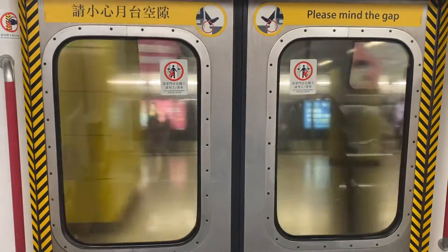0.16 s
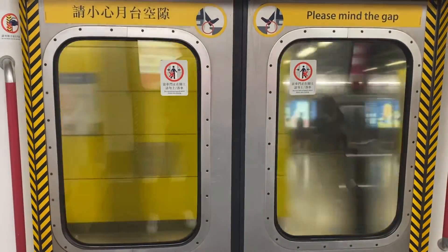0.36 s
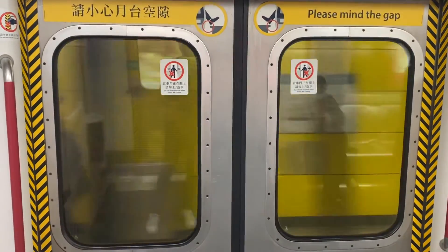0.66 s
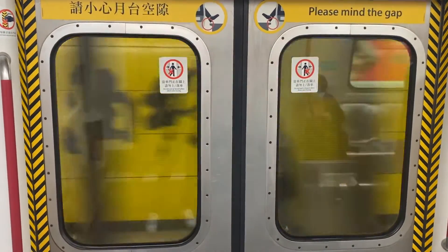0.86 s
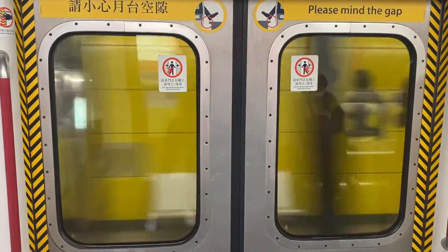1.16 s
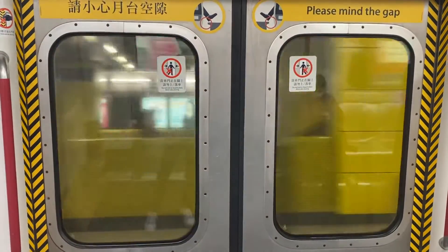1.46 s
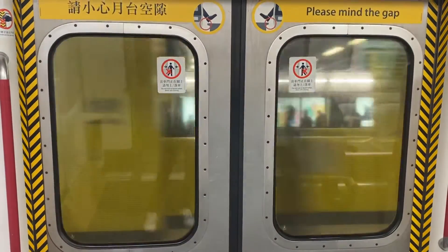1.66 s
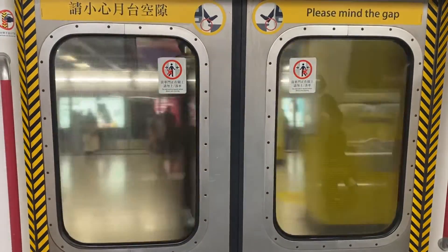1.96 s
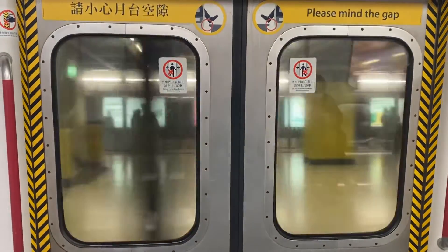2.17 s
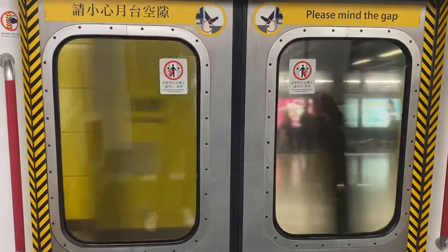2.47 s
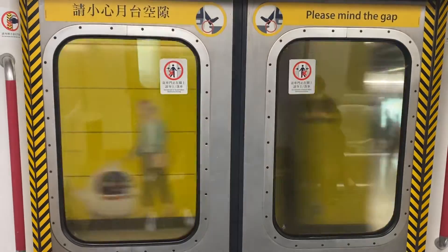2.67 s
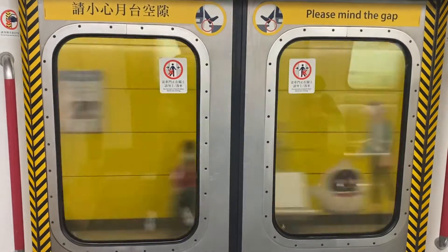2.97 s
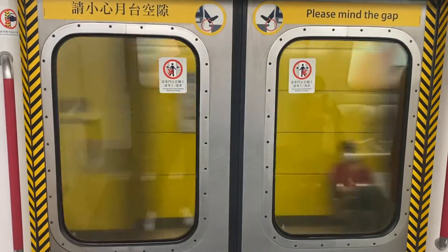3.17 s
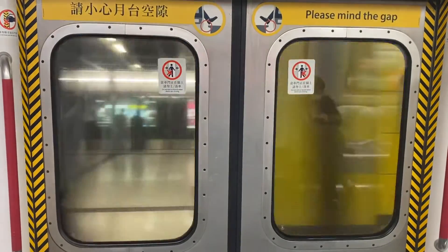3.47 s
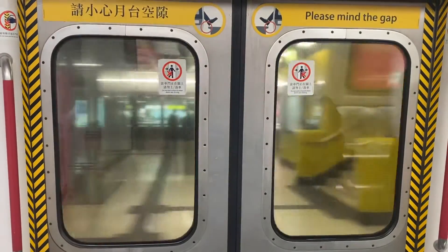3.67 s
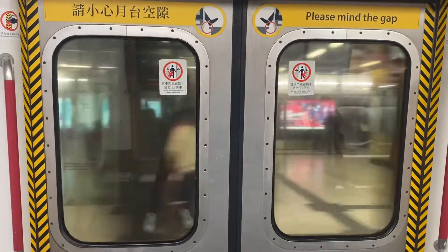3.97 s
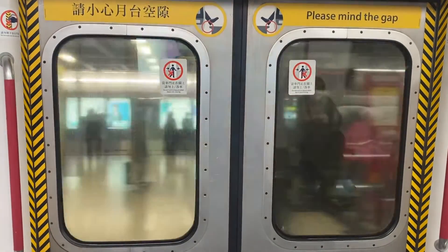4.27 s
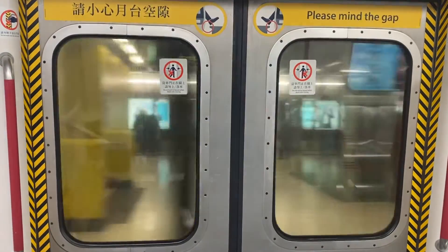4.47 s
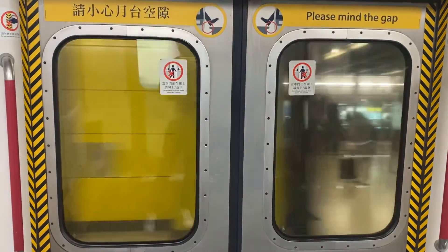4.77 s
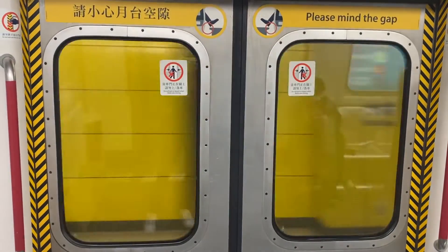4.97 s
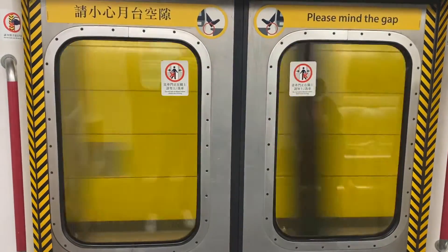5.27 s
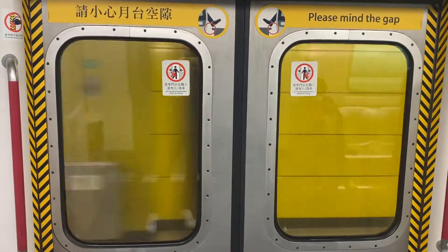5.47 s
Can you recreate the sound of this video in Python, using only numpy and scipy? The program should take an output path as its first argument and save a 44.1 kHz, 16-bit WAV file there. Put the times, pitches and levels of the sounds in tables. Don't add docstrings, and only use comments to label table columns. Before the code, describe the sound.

Train interior slowing along a platform: steady rumbling roar, uneven booms, descending gear and motor whine, a brake-valve burst, faint final squeak.

```python
import sys
import numpy as np
from scipy import signal
from scipy.fft import rfft, irfft, next_fast_len
from scipy.io import wavfile
from scipy.ndimage import uniform_filter1d

SR = 44100
rng = np.random.default_rng(int(sys.argv[2]) if len(sys.argv) > 2 else 0)


def undo_db(level):
    steps = np.asarray(level, float) / 20
    return 10 ** steps


def persist_wave(psi):
    counts = np.round(np.clip(psi, -1, 1) * 32767).astype(np.int16)
    wavfile.write(sys.argv[1], SR, np.atleast_2d(counts).T)


N = 247842
T = np.arange(N) / SR


def evened(x):
    return x / np.sqrt(np.mean(x ** 2, -1, keepdims=True) + 1e-20)


def read(points, hz, axis=1):
    columns = np.transpose(points)
    return np.interp(np.log(hz + 1), np.log(columns[0] + 1), columns[axis])


def curve(rows, axis=1):
    columns = np.transpose(rows)
    return np.interp(T, columns[0], columns[axis])


def hiss(size=N):
    return rng.standard_normal((2, size))


def resonate(x, hz, width, order=1):
    carrier = np.exp(2j * np.pi * np.cumsum(hz * np.ones(x.shape[-1])) / SR)
    pole = np.exp(-np.pi * width / SR)
    x = x / carrier
    for _ in range(order):
        x = signal.lfilter([1 - pole], [1, -pole], x)
    return 2 * (carrier * x).real


def steadied(x, span):
    return x / np.sqrt(uniform_filter1d(x ** 2, round(span * SR), axis=-1) + 0.1)


def swells(rows, steady_db):
    power = undo_db(steady_db) ** 2
    for s, db, length in rows:
        power = power + undo_db(db) ** 2 * np.exp(-(2.5 * (T - s) / length) ** 2)
    return np.sqrt(power)


def drift(hz):
    return evened(signal.lfilter([1], [1, -np.exp(-2 * np.pi * hz / SR)], hiss()[0]))


# [f/Hz, level/dB per Hz]
ROAR_SPECTRUM = [(18, -10), (35, 4.5), (120, 6), (400, 3.5), (650, 0), (930, -4.5), (1600, -12),
                 (2200, -15), (3200, -23.5), (5000, -29), (6000, -34.5), (9000, -40), (13200, -48.5),
                 (14600, -53.5)]
# [f/Hz, width/Hz, level/dB]
WALL_PANELS = [(350, 39, 6.5), (626, 73, 3.5), (1090, 130, 3.5), (1355, 120, 3.5)]
ROAR_DB = -24.5
ROAR_FADE_DB, HISS_FADE_DB = 0.59, -0.29


def roar():
    frames, hz = N // 256 + 5, np.fft.rfftfreq(1024, 1 / SR)
    a, b, c, d, patches = rng.standard_normal((frames, 513, 5)).T
    patches = uniform_filter1d(uniform_filter1d(patches, 10, 0), 14, 1)
    trebleness = np.clip(np.log2(hz / 1500 + 1e-3), 0, 1)[:, None]
    treble_db = trebleness * -HISS_FADE_DB * np.arange(frames) * 256 / SR
    colour_db = read(ROAR_SPECTRUM, hz)
    for f, width, db in WALL_PANELS:
        colour_db = colour_db + db / (1 + (2 * (hz - f) / width) ** 2)
    gain = undo_db(colour_db[:, None] + 0.92 * patches / patches.std() + treble_db)
    spectra = np.array([a + 1j * b, c + 1j * d]) * gain
    noise = signal.istft(spectra, nperseg=1024, noverlap=768)[1][:, :N]
    return undo_db(ROAR_DB - ROAR_FADE_DB * T) * evened(noise)


# [f/Hz, width/Hz, level/dB]
BODY_MODES = [(55, 28, -1), (85, 18.7, 3)]
# [t/s, peak level/dB, length/s]
RAIL_JOLTS = [(.14, -20.5, 0.028), (.23, -20, 0.043), (.46, -25.5, 0.035), (.85, -26.5, 0.1),
              (1.04, -26, 0.046), (1.14, -23.5, 0.12), (1.37, -24, 0.067), (1.66, -29.5, 0.033),
              (1.91, -19.5, 0.11), (2.03, -27, 0.041), (2.2, -26, .16), (2.44, -22, 0.088),
              (2.55, -18.5, 0.041), (2.78, -24.5, 0.11), (2.91, -26, .1), (3.08, -28.5, 0.11),
              (3.29, -24.5, .07), (3.43, -21.5, .14), (3.52, -23.5, 0.063), (3.65, -22.5, 0.05),
              (4.0, -28, 0.24), (4.21, -26.5, 0.22), (4.48, -23.5, 0.16), (4.75, -23, .1),
              (5.04, -21, 0.14), (5.34, -23, 0.11), (5.53, -25, 0.049)]
# [t/s, peak level/dB, length/s]
ROUGH_STRETCHES = [
    (.2, -39, 0.23),
    (.68, -36, 0.14),
    (1.3, -36.5, 0.68),
    (2.2, -40.5, 0.42),
    (3.38, -29.5, 0.13),
    (3.7, -32, 0.68),
    (4.4, -30, 0.16),
    (4.79, -30, 0.19),
    (5.3, -37, 1),
]
FLOOR_HZ, FLOOR_WIDTH = 166.3, 12
BOOM_DB, FLOOR_DB = -30, -44.5


def boom():
    modes = 0
    for hz, width, db in BODY_MODES:
        modes = modes + undo_db(db) * steadied(evened(resonate(hiss(), hz, width, order=2)), 0.1)
    floor = steadied(evened(resonate(hiss(), FLOOR_HZ, FLOOR_WIDTH, order=2)), 0.12)
    return swells(RAIL_JOLTS, BOOM_DB) * evened(modes) + swells(ROUGH_STRETCHES, FLOOR_DB) * floor


# [t/s, gear mesh f/Hz, motor load level/dB]
BRAKING = [(0, 366, 0.5), (.8, 356.2, -1), (1.6, 339, 2.5), (2.3, 329.1, 1.5), (3.1, 318, 1),
           (3.9, 303.4, 1.5), (4.3, 298.4, 1), (4.7, 294, 1.5), (5.62, 283.9, 1.5)]
# [multiple of the mesh, width/Hz, level/dB, fade/dB per second of braking]
WHINE_PARTIALS = [(1.95, 82, -34, 2.5), (3.022, 31, -41.5, 1.5), (6.21, 43, -55, 1.5),
                  (12.09, 180, -54.5, 0.5), (12.65, 180, -58, 1), (15.4, 300, -65, 0.5),
                  (24.4, 500, -67, 0.5), (36.4, 500, -73, 2.5)]
# [f/Hz, width/Hz, level/dB]
GEAR_CASE = [
    (327.3, 9.9, -26),
    (304.8, 7.5, -23),
    (296.5, 4.1, -31.5),
]
# [t/s, peak level/dB, length/s]
TOOTH_SURGES = [(.025, -20, 0.12), (.22, -22, 0.076), (.36, -26.5, 0.044), (.46, -21, 0.055),
                (.55, -28, .07), (.71, -23, .07), (.9, -24, 0.071), (1.03, -23, .04), (1.19, -23.5, 0.079),
                (1.5, -21.5, 0.077), (1.6, -31, 0.067), (1.86, -23, 0.064), (2.0, -26, .04),
                (2.17, -24, 0.056), (2.3, -23.5, 0.083), (2.57, -24, 0.065), (2.86, -28, 0.059),
                (3.02, -19.5, 0.032), (3.26, -26, .06), (3.52, -24, .09), (3.65, -24, 0.029),
                (3.84, -19.5, 0.079), (4.05, -21.5, 0.072), (4.4, -26.5, .08), (4.52, -25, 0.046),
                (4.8, -28, 0.24), (5.16, -24, 0.028), (5.42, -21, 0.15)]
MESH_DB = -33
CLEAN_LOW, CLEAN_TOP = 0.2, 0.88


def whine():
    mesh_hz, load_db = curve(BRAKING), curve(BRAKING, axis=2)
    power = swells(TOOTH_SURGES, MESH_DB) ** 2
    for f, width, db in GEAR_CASE:
        power = power + undo_db(db) ** 2 / (1 + (2 * (mesh_hz - f) / width) ** 4)
    grip = power / (power + undo_db(-28.5) ** 2)
    clean = np.clip(CLEAN_LOW + (CLEAN_TOP - CLEAN_LOW) * grip, 0, 1)
    phase = 2 * np.pi * np.cumsum(mesh_hz + 3.21 * drift(7.9)) / SR
    tone = np.sqrt(2) * np.cos(phase + np.array([[3.0], [3.6]]))
    skirt = steadied(evened(resonate(hiss(), 1.0225 * mesh_hz, 50, order=2)), 0.057)
    out = np.sqrt(power) * (np.sqrt(clean) * tone + np.sqrt(1 - clean) * skirt)
    for multiple, width, db, fade_db in WHINE_PARTIALS:
        patchy_db = 1.5 * uniform_filter1d(drift(8.8), 900)
        level_db = db - fade_db * T + load_db + patchy_db
        out += undo_db(level_db) * evened(resonate(hiss(), multiple * mesh_hz, width, order=2))
    return out


# [f/Hz, level/dB]
STEADY_TONES = [(775.5, -44.5), (1820, -60), (2079, -56.5), (2600, -64.5)]


def tones():
    return sum(undo_db(db) * evened(resonate(hiss(), hz, 5.2)) for hz, db in STEADY_TONES)


# [t/s, level/dB, hold/s, t60/s, low f/Hz, high f/Hz]
AIR_SPITS = [
    (.652, -49, .045, .25, 3300, 4400),
    (.652, -52, .04, .3, 5200, 9200),
    (3.651, -57, .011, .03, 8200, 16000),
    (3.66, -63, .025, .2, 8200, 16000),
]


def spits():
    out, t = np.zeros((2, N)), np.arange(SR // 4) / SR
    for s, db, hold, t60, lo_hz, hi_hz in AIR_SPITS:
        band = signal.butter(3, [lo_hz, hi_hz], "band", fs=SR, output="sos")
        jet = evened(signal.sosfilt(band, hiss(len(t))))
        fall_db = 60 * np.maximum(t - hold, 0) / t60
        onset = np.clip(t / 0.003, 0, 1)
        out[:, round(s * SR):][:, :len(t)] += undo_db(db - fall_db) * onset * jet
    return out


# [t/s, length/s, start
# f/Hz, end f/Hz, width/Hz, level/dB]
PAD_SQUEAKS = [
    (5.41, .11, 14900, 15000, 260, -58),
    (5.48, .14, 14400, 14000, 320, -63),
    (2.08, .2, 1800, 1820, 13, -47.5),
    (4.3, .66, 2100, 2000, 16, -58),
    (1.15, 1, 14100, 14200, 500, -74),
    (1.9, .7, 14700, 14100, 700, -75),
    (3.1, 1, 14900, 14600, 800, -73),
    (3.8, 1, 14700, 14000, 700, -74),
    (4.45, .8, 14300, 14800, 800, -76),
]


def squeaks():
    out = np.zeros((2, N + SR))
    for s, length, start_hz, end_hz, width, db in PAD_SQUEAKS:
        u = np.linspace(0, 1, round(length * SR))
        glide_hz = start_hz + (end_hz - start_hz) * u
        glide = resonate(hiss(SR)[:, :len(u)], glide_hz, width, order=2)
        swell = np.sin(np.pi * u ** 0.82)
        out[:, round(s * SR):][:, :len(u)] += undo_db(db) * swell * steadied(evened(glide), 0.06)
    return out[:, :N]


# [t/s, rise/s, first crack level/dB, crack length/s, time before pressure drops/s]
VALVE_BLOW = (2.7555, .002, 4, .008, .05)
# [f/Hz, width/Hz, level/dB, t60/s]
VALVE_RINGS = [(4670, 300, -45.5, .62), (4900, 340, -42.5, .66), (5250, 420, -48, .62),
               (5750, 450, -48.5, .6), (6400, 480, -41, .6), (7400, 1200, -51, .62),
               (8800, 1100, -45.5, .5), (10000, 1000, -49.5, .5), (11500, 1500, -55, .45),
               (13000, 1300, -52.5, .38), (14500, 1100, -53, .27), (15600, 800, -53, .14)]


def blow():
    s, rise, crack_db, crack, hold = VALVE_BLOW
    t = np.arange(SR) / SR
    falling = np.hypot(t, hold) - hold
    rings = 0
    for hz, width, db, t60 in VALVE_RINGS:
        rings = rings + undo_db(db - 60 * falling / t60) * evened(resonate(hiss(SR), hz, width, order=2))
    out = np.zeros((2, N))
    onset = np.clip(t / rise, 0, 1) * undo_db(crack_db * np.exp(-t / crack))
    out[:, round(s * SR):][:, :SR] = rings * onset
    return out


def scene():
    return roar() + boom() + whine() + tones() + spits() + squeaks() + blow()


def roll_off(x):
    return signal.sosfilt(signal.butter(12, 15670, fs=SR, output="sos"), x)


# [f/Hz, left-right likeness, left-right level/dB]
MIC_PORTS = [(60, 0.96, -0.5), (313, 0.92, 4), (395, 0.48, -1.5), (700, 0.049, 2.5), (1780, 0.081, -1),
             (2550, 0.66, 2), (4800, 0.69, 2), (5500, 0.67, 3), (6340, 0.95, 0), (16000, .998, 0)]
IN_PHASE_HZ, TURN_HZ, SHADOW_HZ = 6930, 4160, 6400
EDGE_HZ, EDGE_DB = 14600, 15
PAD = 1000


def record(dry):
    wide = np.pad(dry, ((0, 0), (PAD, PAD)), "reflect", reflect_type="odd")
    wide = wide * signal.windows.tukey(N + 2 * PAD, 2 * PAD / (N + 2 * PAD))
    size = next_fast_len(N + 2 * PAD)
    hz = np.fft.rfftfreq(size, 1 / SR)
    direct, scatter = rfft(wide, size) * undo_db(-EDGE_DB * np.maximum(hz - EDGE_HZ, 0) / 1000)
    same = np.clip(read(MIC_PORTS, hz), 0, 1)
    treble_turn = 2 * np.pi * (hz - IN_PHASE_HZ) / TURN_HZ
    phase = np.where(hz > SHADOW_HZ, treble_turn, -0.3 * np.clip(hz / 2500, 0, 1))
    right = same * direct * np.exp(1j * phase) + np.sqrt(1 - same ** 2) * scatter
    lean = undo_db(0.5 * read(MIC_PORTS, hz, axis=2))
    ports = irfft(np.array([direct * lean, right / lean]), size)[:, PAD:PAD + N]
    return roll_off(ports)


dry = scene()
out = record(dry)
persist_wave(out)
```